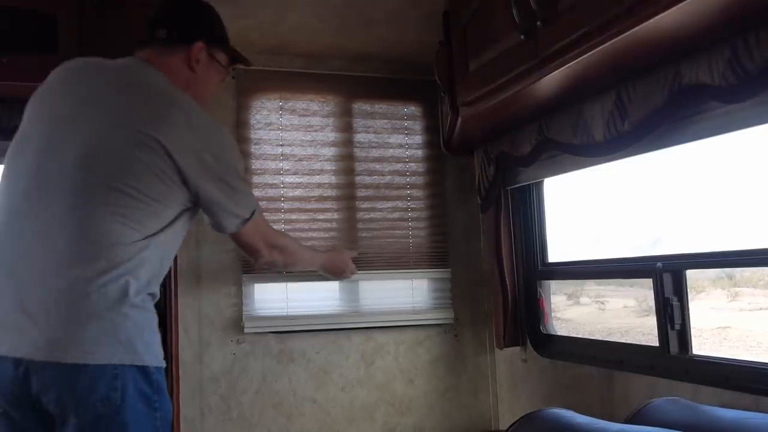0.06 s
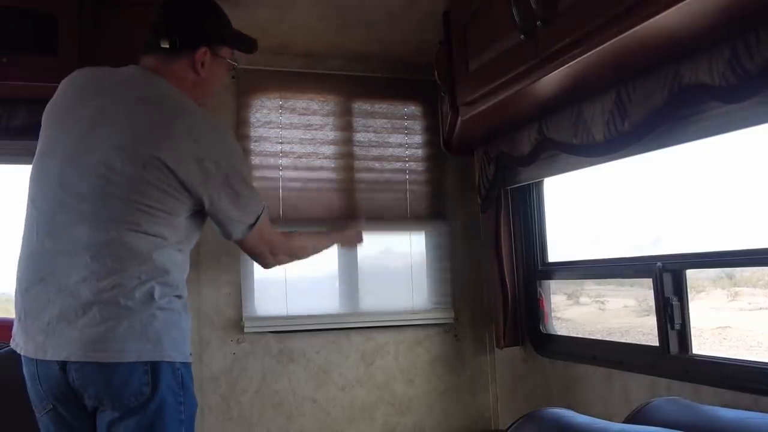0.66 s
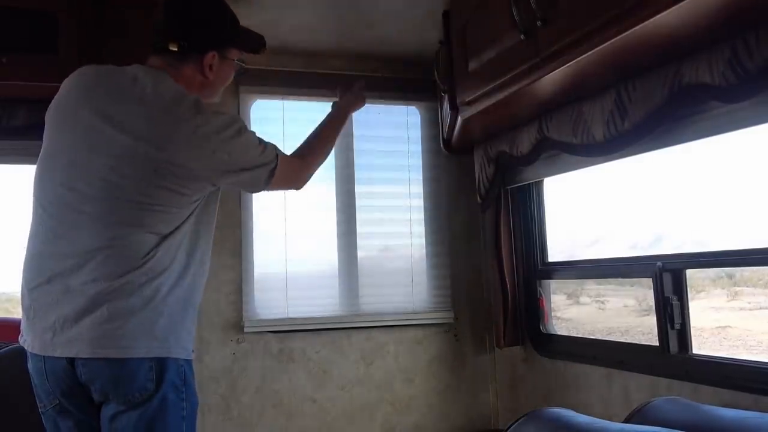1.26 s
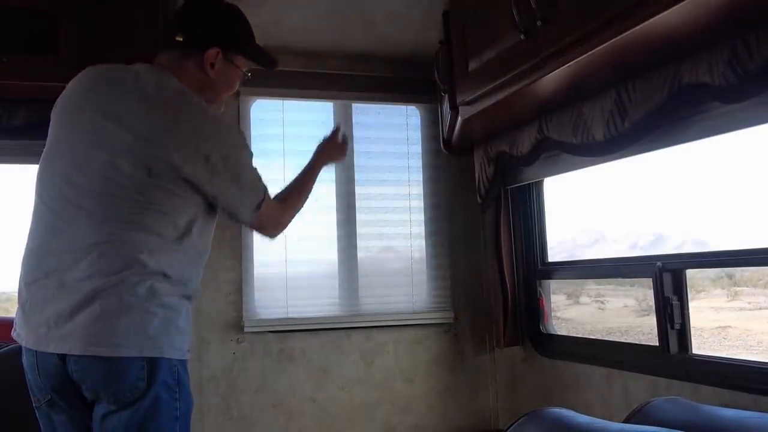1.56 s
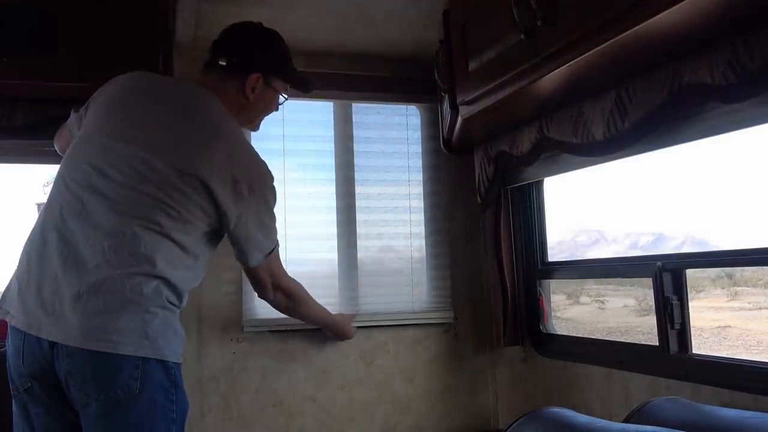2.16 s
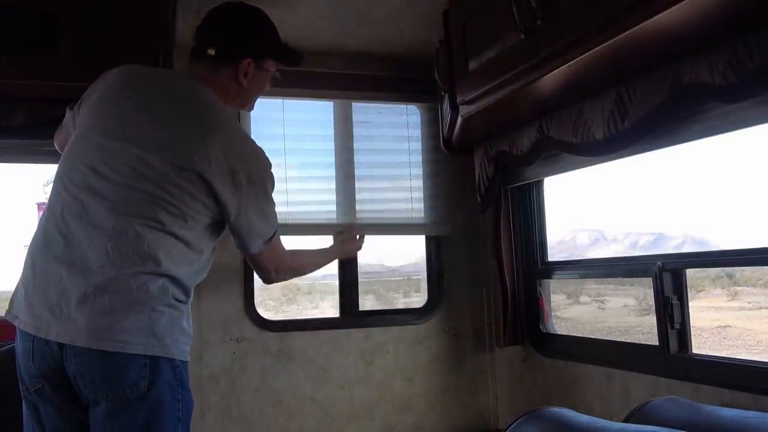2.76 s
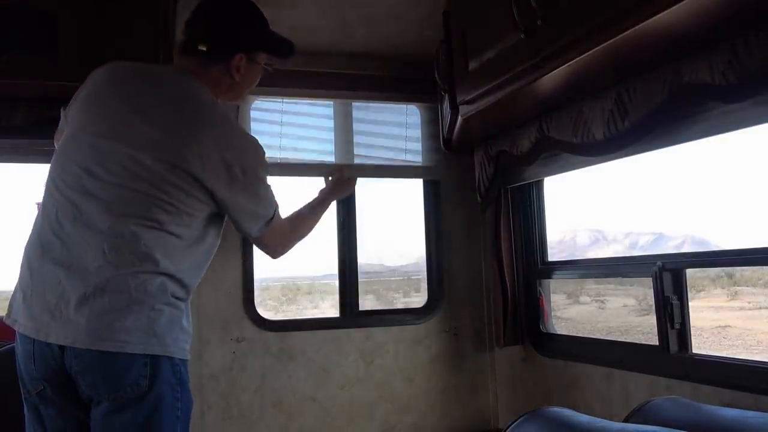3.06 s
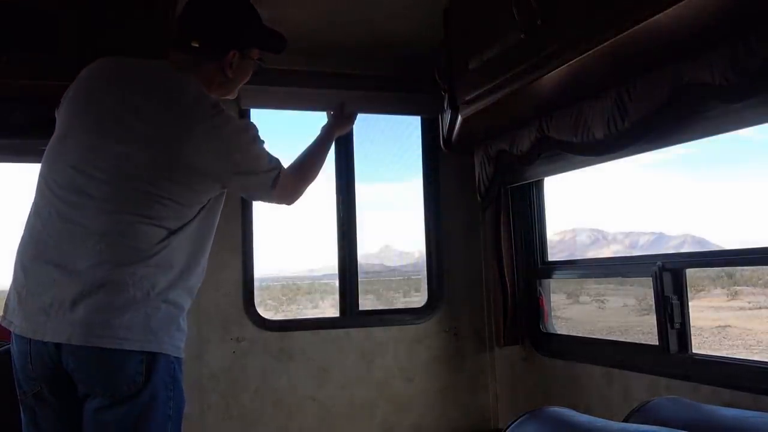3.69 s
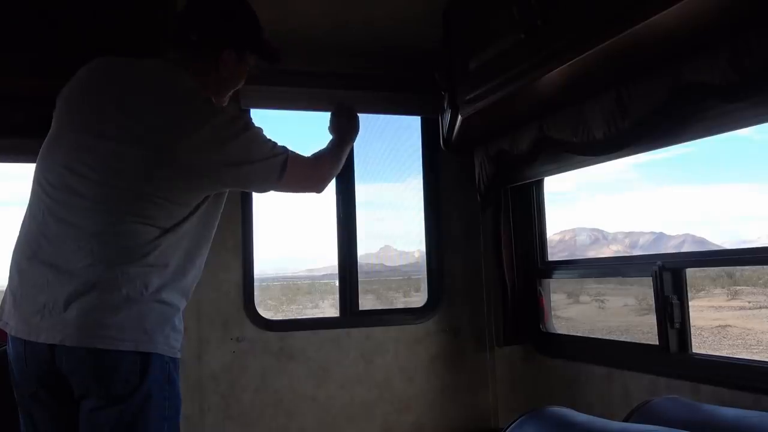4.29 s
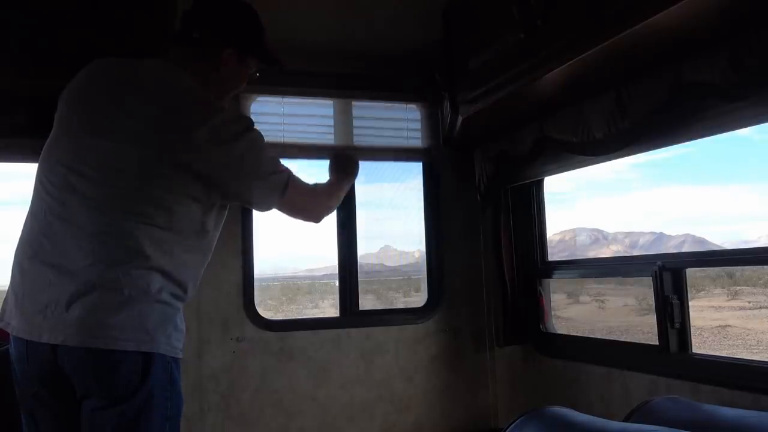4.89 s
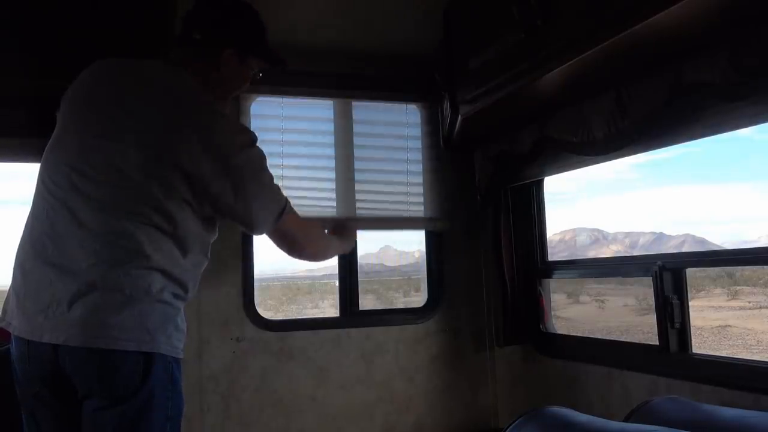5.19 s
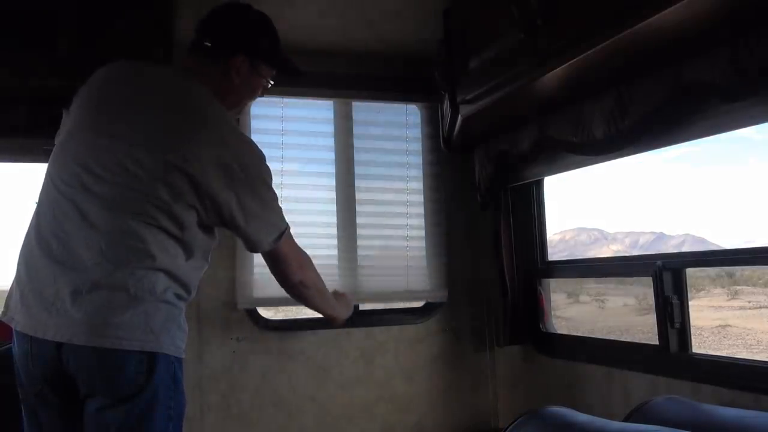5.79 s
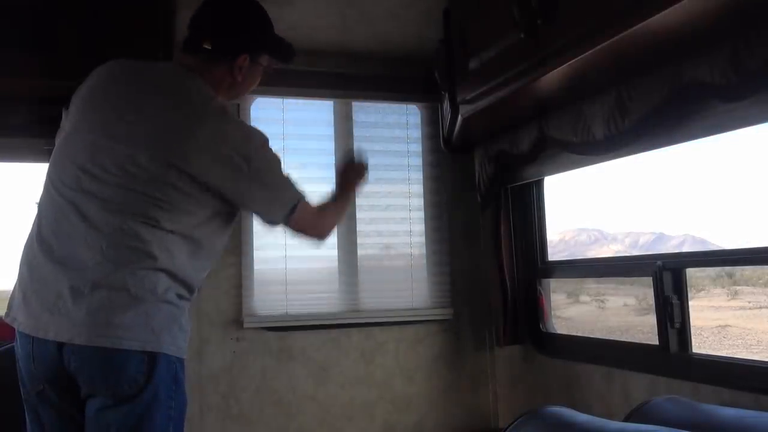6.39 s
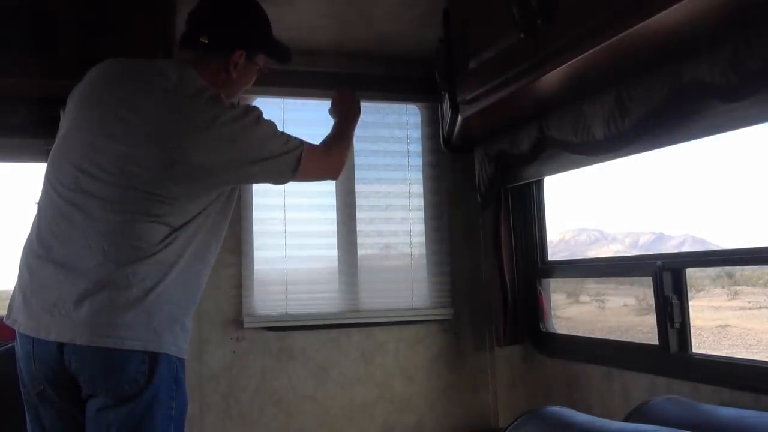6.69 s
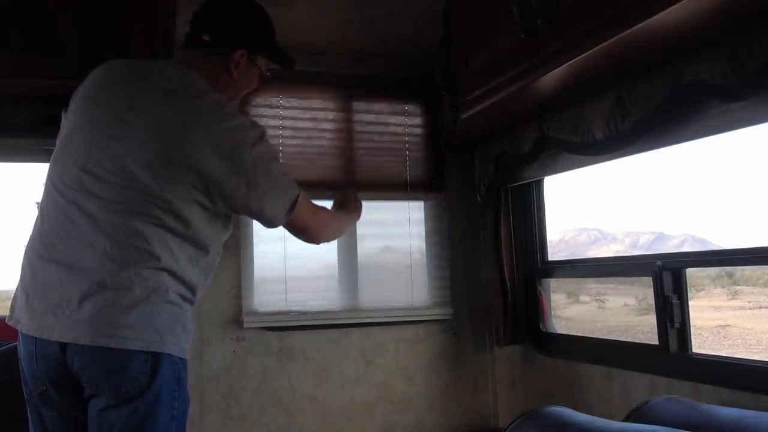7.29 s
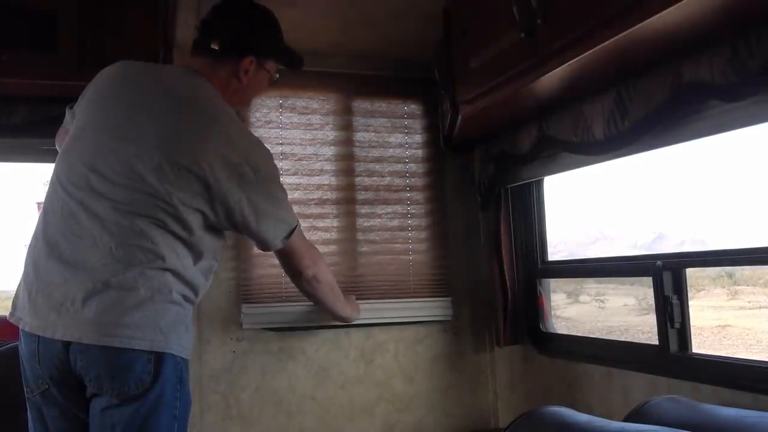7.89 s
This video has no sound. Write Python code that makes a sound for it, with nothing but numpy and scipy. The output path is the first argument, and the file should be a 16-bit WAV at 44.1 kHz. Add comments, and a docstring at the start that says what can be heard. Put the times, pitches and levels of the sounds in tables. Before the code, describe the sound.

A sharp rail clack comes at 0.2 seconds, close by in a small, quiet camper. From 0.5 to 1.2 seconds a pleated shade slides up, its cords whining up and then down in pitch over a dry rasp, ending in a knock. Light taps follow. A second, softer slide runs from 2.3 to 3.5 seconds, with a clack at 2.5 and a quick, loud cluster of clacks at the end. After a few small ticks, the shade is drawn down from 4.6 to 6 seconds with a wavering whine and hissy scrape, stopping with a clack. At 6.2 a knock comes with a low cord twang. The last slide, from 6.9 to 7.9 seconds, whines more strongly, rising and falling, and ends in a light click. A faint room hush lies underneath.

```python
"""Pleated shade in a camper

Close up in a small panelled camper, on a stereo microphone: a day-and-night shade is slid by hand,
twice up and twice down. Its taut braided cords whine through the rails at a pitch that follows the
hand's speed, while cords and pleats rasp. The rails clack at the ends of travel; a released cord twangs."""
import sys
import numpy as np
from scipy import signal
from scipy.fft import rfft, irfft, next_fast_len
from scipy.io import wavfile
from scipy.ndimage import map_coordinates

SR = 44100
rng = np.random.default_rng(int(sys.argv[2]) if len(sys.argv) > 2 else 0)


def wav_out(sig):
    """Save sig, one row per channel (or a flat mono array), as 16-bit PCM at SR to the path in sys.argv[1]."""
    wavfile.write(sys.argv[1], SR, np.round(np.clip(np.atleast_2d(sig).T, -1, 1) * 32767).astype(np.int16))


N = 355005
TIME = np.arange(N) / SR


def amp(db):
    """Decibels to gain."""
    return 10 ** (np.asarray(db) / 20)


def unit(x):
    """Scale to rms 1."""
    return x / np.sqrt(np.mean(x ** 2) + 1e-20)


def along(points, hz):
    """Read (Hz, value) points at hz, on a log axis."""
    freqs, values = np.transpose(points)
    return np.interp(np.log(hz + 1), np.log(freqs + 1), values)


def curve(points):
    """Join (seconds, value) points into one value per sample."""
    return np.interp(TIME, *np.transpose(points))


def bell(x, centre, width):
    """A smooth bump of height 1."""
    return np.exp(-np.minimum(((x - centre) / width) ** 2, 50))


def peaks(resonances, hz):
    """The lift in dB that a set of resonances gives at hz."""
    return sum(db * bell(hz, centre, width) for centre, width, db in resonances)


def swell(start, stop, rise, release=0.029):
    """Gain that climbs 20 dB per rise time up to start, holds until stop, then falls 20 dB per release."""
    return amp(-20 * (np.maximum(start - TIME, 0) / rise + np.maximum(TIME - stop, 0) / release))


def wobble(rate):
    """A smooth random curve, rate knots a second."""
    return map_coordinates(rng.standard_normal(int(N * rate / SR) + 4), [TIME * rate], order=2)


def filtered(x, response):
    """Shape x by a gain that depends on frequency."""
    n = x.shape[-1]
    size = next_fast_len(n + 8192)
    return irfft(rfft(x, size) * response(np.fft.rfftfreq(size, 1 / SR)), size)[..., :n]


def band(x, lo_hz, hi_hz, order=2):
    """Causal band-pass."""
    sos = signal.butter(order, [lo_hz, min(hi_hz, SR / 2 - 1)], "band", fs=SR, output="sos")
    return signal.sosfilt(sos, x)


# Room tone of the still cabin. Each row: frequency in Hz, relative density in dB.
ROOM_TONE = [(12, -29), (20, -3.5), (49, -7.5), (70, -4), (107, -3), (354, -7), (442, -5), (494, -5.5),
             (772, -3.5), (1730, -12), (2110, -14.5), (4350, -16.5), (15700, -20.5)]
def air(level_db=-62.0, side_db=-5):
    """The steady hush of the cabin, all around the microphone."""
    mid, side = unit(filtered(rng.standard_normal((2, N)), lambda hz: amp(along(ROOM_TONE, hz))))
    side = amp(side_db) * side
    drift_db = 0.6 * wobble(6)
    return amp(level_db + drift_db) * np.array([mid + side, mid - side])


# Decay of the cabin's reflections. Each row: frequency in Hz, t60 in seconds.
CABIN_DECAY = [(100, 0.2), (300, .18), (900, 0.24), (1600, 0.26), (3000, 0.2), (12000, 0.24)]
# Their stereo width. Each row: frequency in Hz, side minus mid in dB.
CABIN_WIDTH = [(100, -2), (500, -5), (1000, -8), (2000, -2.5), (5000, 0.5), (12000, 1.5)]
def cabin(x, wet_db, build_s=0.0004, hop=4096):
    """Direct sound plus the quick, dense answer of nearby panels, which shifts as rail and arm move."""
    count = N // hop + 2
    padded = np.pad(x, (hop, count * hop - N))
    pieces = padded[np.arange(count)[:, None] * hop + np.arange(2 * hop)] * np.sqrt(np.hanning(2 * hop))
    # Each overlapping piece gets its own tail of decaying noise.
    hz, t, spectra = signal.stft(rng.standard_normal((2, count, 3 * hop)), SR, nperseg=256)
    spectra = spectra * amp(-60 * t / along(CABIN_DECAY, hz)[:, None]) * (1 - np.exp(-t / build_s))
    spectra[1] *= amp(along(CABIN_WIDTH, hz))[:, None]
    mid, side = signal.istft(spectra, SR, nperseg=256)[1]
    tails = np.array([mid + side, mid - side]) / np.linalg.norm(mid, axis=1)[:, None]
    wet = np.zeros((2, (count + 5) * hop))
    for k, echo in enumerate(signal.fftconvolve(pieces[None], tails, axes=2).swapaxes(0, 1)):
        wet[:, k * hop:][:, :echo.shape[1]] += echo
    return (x + amp(wet_db) * wet[:, hop:hop + N]) / np.hypot(1, amp(wet_db))


# Fingers on the pleats. Each row: middle and half length in seconds, level in dB, centre in Hz.
FINGER_BRUSHES = [(.01, 0.03, -53.5, 2460), (0.133, 0.061, -53.5, 2430), (1.955, 0.027, -54.5, 3150),
                  (4.193, 0.033, -58, 6450), (6.173, 0.067, -59, 2200)]
def brushes(grain_db=2.0):
    """The pleats crinkle softly as the hand takes hold."""
    crinkle = rng.standard_normal(N) * amp(grain_db * wobble(500))
    return sum(amp(db) * bell(TIME, s, half) * unit(band(crinkle, hz / 2, hz * 2, order=1))
               for s, half, db, hz in FINGER_BRUSHES)


# The hand takes up the slack. Each row: start and stop in seconds, level in dB.
CORD_CREEPS = [(2.28, 2.42, -62), (4.512, 4.876, -60.5)]
def creeps(lo_hz=1130, hi_hz=1370, rise_s=0.022, uneven_db=4.5):
    """Slow slips of the cord ring one narrow resonance of the rail."""
    slips = unit(band(rng.standard_normal(N), lo_hz, hi_hz)) * amp(uneven_db * wobble(30))
    return slips * sum(amp(db) * swell(start, stop, rise_s) for start, stop, db in CORD_CREEPS)


# A cord let go. Each row: start in seconds, level in dB, pitch in Hz, t60 in seconds.
CORD_TWANGS = [(1.13, -47, 90.7, 0.33), (1.951, -46.5, 116, 0.26), (3.566, -43, 94, 0.36),
               (6.196, -34, 111.6, 0.43), (7.896, -48, 108, 0.18)]
def twangs(third_db=-7, attack_s=0.0036):
    """A taut cord swings in its first and third modes; the upper one dies sooner."""
    track, t = np.zeros(N), np.arange(SR) / SR
    for s, db, hz, t60 in CORD_TWANGS:
        fade, phase = amp(-60 * t / t60), 2 * np.pi * hz * t
        swing = fade * np.sin(phase) + amp(third_db) * fade ** 2 * np.sin(3 * phase)
        add(track, s, amp(db) * swing * (1 - np.exp(-t / attack_s)))
    return track


def add(track, s, sound):
    """Mix a sound into a track from s seconds on."""
    part = track[round(s * SR):][:len(sound)]
    part += sound[:len(part)]


# The night shade's slacker second cord. Each row: start and stop in seconds, level in dB,
# note in Hz when the whine is at 1 kHz, power of hand speed that the note follows.
CORD_HUMS = [(0.557, 0.58, -48, 539, .1), (.7, .92, -44.5, 470, .25), (6.92, 6.99, -46, 298.5, .1),
             (7.17, 7.501, -49.5, 365, .85)]
def hum(rise_s=0.035, waver_rad=0.96, flutter_db=4.0):
    """The slack cord catches unevenly, so its one low note wavers."""
    speed = curve(np.vstack(HAND_SPEEDS)) / 1000
    waver = waver_rad * wobble(90)
    notes = np.zeros(N)
    for start, stop, db, hz, power in CORD_HUMS:
        phase = 2 * np.pi * np.cumsum(hz * speed ** power) / SR
        notes += amp(db) * swell(start, stop, rise_s) * np.sin(phase + waver)
    return notes * amp(flutter_db * wobble(70))


# Modes of the wall panel. Each row: frequency in Hz, relative level in dB.
PANEL_MODES = [(206, -2.5), (273, 0.5), (350, -5), (465, 2)]
def wall_bumps(t60=0.08, attack_s=0.0028, db_per_octave=24):
    """Each rail contact swings the wall panel, most in the modes near the note of the struck spot."""
    track, t = np.zeros(N), np.arange(SR // 2) / SR
    for s, level, thud_trim, _, _, note in RAIL_CONTACTS:
        swings = sum(amp(db - db_per_octave * abs(np.log2(hz / note))) * np.sin(2 * np.pi * hz * t)
                     for hz, db in PANEL_MODES)
        add(track, s, amp(level + thud_trim - 60 * t / t60) * swings * (1 - np.exp(-t / attack_s)))
    return track


# Modes of a struck rail. Each row: frequency in Hz, relative level in dB, t60 in seconds.
RAIL_RING = [(980, -4, 0.26), (1163, -0.5, 0.26), (1346, -28, 0.076), (1420, -8, 0.12), (1590, -4, 0.2),
             (1780, -7, 0.26), (1860, -5.5, 0.28), (2030, -8, 0.26), (2160, -8, 0.15), (2430, -12.5, 0.32)]
# Knocks of the rails. Each row: start in seconds, level in dB, thud trim and snap trim in dB,
# centre of the clack in Hz, wall note that this spot favours in Hz.
RAIL_CONTACTS = [(0.1906,-13,-11,-3,1040,397), (1.157,-23,-2,-7.5,1150,218), (1.465,-30,1,-7.5,1130,150),
                 (1.948,-48.5,8.5,-1,1900,189), (2.254,-38,-4,-14,950,310), (2.492,-19,-9,2.5,800,464),
                 (3.528,-22.5,-16,-1.5,920,404), (3.556,-18,-2.5,1,1040,302), (3.5642,-16,-2.5,7,940,290),
                 (3.57,-14,-3.5,-9,1330,320), (4.224,-33.5,-2.5,2,1210,290), (4.482,-44,-1.5,-29,524,455),
                 (4.5,-44,-14,0,1350,400), (4.698,-38.5,1,-21,1202,288), (5.734,-37.5,-5,-15,460,339.4),
                 (5.985,-19.5,-6.5,-2,1835,196), (6.182,-27,-3.5,-3.5,1390,333),
                 (6.684,-44.5,0.5,-10,860,200), (6.79,-38.5,-4,-14,600,460), (7.335,-35,-0.5,-9,1140,280.2),
                 (7.894,-32,-10,1,1150,300), (7.974,-44,-6,-5,500,250.4)]
def clacks(thud_t60=0.1, clack_t60=0.075, snap_t60=0.031, spread=1.7,
           thud_db=-10, clack_db=-4.5, snap_db=-4, ring_db=-26, graze_db=-28):
    """Each contact scuffs, thuds in the wall, rings the rail and snaps on its plastic end caps."""
    track, t = np.zeros(N), np.arange(SR // 2) / SR
    for s, level, thud_trim, snap_trim, centre, _ in RAIL_CONTACTS:
        # A harder snap reaches higher into the treble and sets in faster.
        top_hz = 11000 * amp(0.4 * snap_trim)
        attack_s = 0.00045 * amp(-0.7 * snap_trim)
        wall, rail, caps = rng.standard_normal((3, len(t)))
        wall = unit(band(wall, 96, 470, order=3))
        rail = unit(band(band(rail, centre / spread, centre * spread), 315, 1980, order=3))
        caps = unit(band(band(caps, 2500, 6450, order=1), 2250, top_hz))
        ring = sum(amp(db + rng.normal(0, 0.83) - 60 * t / t60)
                   * np.sin(2 * np.pi * (hz * t + rng.random())) for hz, db, t60 in RAIL_RING)
        thud = amp(thud_db + thud_trim - 60 * t / thud_t60) * wall
        clack = amp(clack_db - 60 * t / clack_t60) * rail + amp(ring_db) * ring
        snap = amp(snap_db + snap_trim - 60 * t / snap_t60) * caps
        add(track, s, amp(level) * (thud + clack + snap) * (1 - np.exp(-t / attack_s)))
        # The parts graze each other just before they meet.
        add(track, s - 0.03, amp(level + graze_db) * rail * bell(t, 0.021, 0.01))
    return track


# Colour of each fabric's friction. Each row: frequency in Hz, relative density in dB.
NIGHT_FRICTION = [(47, -64), (80, -15), (241, -20.5), (276, -12.5), (438, -9), (500, -3), (652, -7.5),
                  (778, -3.5), (1410, -7.5), (1580, -5.5), (1930, -13), (2400, -10), (7090, -20),
                  (12600, -30), (15700, -35)]
DAY_FRICTION = [(47, -55), (80, -18), (133, -36), (202, -23), (241, -26.5), (500, -12), (869, -1.5),
                (950, -4.5), (1110, -0.5), (1610, -5.5), (2100, -5), (2900, -11), (4870, -14.5),
                (10500, -23), (15700, -33)]
# Resonances of each hollow rail. Each row: centre and width in Hz, lift in dB.
NIGHT_RAIL_PEAKS = [(214, 28, 10.5), (490, 16, 2.5), (840, 94, 0.5), (1540, 190, -1), (2400, 160, 2)]
DAY_RAIL_PEAKS = [(216, 6.9, 8), (830, 25.6, 2.6), (1154, 62, 3.8), (2140, 290, 3.1), (4500, 610, 5),
                  (5390, 330, 3.6), (7200, 210, 2.8), (10500, 1100, 1.5)]
SHADES = {"night": (NIGHT_FRICTION, NIGHT_RAIL_PEAKS), "day": (DAY_FRICTION, DAY_RAIL_PEAKS)}
def rub(colour, rail, grain_db=2.0):
    """Tiny, uneven slips of cord and pleats sound through the rail's resonances."""
    slips = rng.standard_normal(N) * amp(grain_db * wobble(900) + 0.58 * wobble(45))
    body = filtered(slips, lambda hz: amp(along(colour, hz) + peaks(rail, hz)))
    rumble = unit(band(body, 130, 383, order=4))
    rasp = unit(band(body, 453, 2584, order=5))
    hiss = unit(band(body, 2662, 14700, order=5))
    return np.array([rumble, rasp, hiss])


# A rail on the wall or window frame. Each row: shade, start and stop of full contact in seconds,
# rise time in seconds, levels of rumble, rasp and hiss in dB.
RAIL_DRAGS = [("night", .34, 0.45, 0.057, -62, -55, -57), ("night", 0.6, .68, 0.14, -59, -42, -44),
              ("night", 1.115, 1.165, 0.15, -49, -42, -51), ("day", 2.411, 2.79, 0.1, -50.5, -41.5, -41.5),
              ("day", 5.5, 5.56, 0.068, -63, -56, -50), ("day", 5.76, 5.98, 0.093, -64, -53, -56),
              ("day", 5.963, 5.98, 0.14, -53, -41, -39.5), ("night", 6.91, 7.0, 0.072, -47.5, -42.5, -51),
              ("night", 7.2, 7.36, 0.24, -60.5, -54, -70), ("night", 7.98, 8.0, 0.12, -61.5, -63, -82)]
def drags():
    """A rail touching the wall adds a coarser, deeper scrape."""
    textures = {shade: rub(*body) for shade, body in SHADES.items()}
    return sum(swell(start, stop, rise) * (amp(levels) @ textures[shade])
               for shade, start, stop, rise, *levels in RAIL_DRAGS)


# One harmonic of the whine briefly swells and sings out. Each row: middle and half length in seconds,
# lift in dB, rough frequency of that harmonic in Hz.
WHINE_FLARES = [(0.777, 0.013, 14.5, 1610), (0.821, 0.0049, 10.5, 1590), (1.089, 0.016, 9.5, 870),
                (1.141, 0.0046, 17, 830), (2.687, 0.016, 12, 900), (2.756, 0.016, 12, 890),
                (2.845, 0.035, 10.5, 840), (3.218, 0.084, 6, 1080), (4.887, 0.016, 12.5, 820),
                (5.0, .05, 6.5, 2080), (5.035, .07, 18.5, 4150), (5.178, 0.049, 15, 3400),
                (5.531, 0.031, 2.5, 1110), (7.045, 0.014, 12, 710), (7.118, 0.032, 7, 810),
                (7.29, 0.019, 7.5, 1130), (7.321, 0.038, 7.5, 2320), (7.548, 0.03, 10, 800),
                (7.699, 0.024, 8.5, 710)]
# Fixed narrow resonances that the whine sweeps across. Each row: centre and width in Hz, lift in dB.
WHINE_RESONANCES = [(500, 15, 9), (718, 6, 5), (845, 13, 2.5), (1110, 23, 3), (1650, 22, 2),
                    (2080, 20, 4.5)]
def whine(hz, colour, second_db, step_db, smear, jitter=0.01506, flutter_db=3.5):
    """Braid ribs tick through the rail at hz; the shade and fixed resonances colour each harmonic."""
    phase = 2 * np.pi * np.cumsum(hz * (1 + jitter * wobble(260))) / SR
    tone = np.zeros(N)
    for k in range(1, 5):
        flare = sum(db * bell(TIME, s, half) for s, half, db, partial in WHINE_FLARES
                    if round(partial / hz[round(s * SR)]) == k)
        level = along(colour, k * hz) + peaks(WHINE_RESONANCES, k * hz) + flare
        blur = 0
        if k > 1:
            level += second_db + step_db * (k - 2)
            blur = smear * k / 2 * wobble(200)  # uneven ribs smear the overtones into a rasp
        tone += amp(level + flutter_db * wobble(100)) * np.sin(k * phase + blur)
    return np.sqrt(2) * tone


# Hand speed, one list a stroke. Each row: time in seconds, tick rate of the braid in Hz.
HAND_SPEEDS = [
    [(.55, 490), (.624, 965), (.732, 1540), (.78, 1614), (.86, 1518), (.932, 1105), (1.03, 900),
     (1.18, 820)],
    [(2.4, 230), (2.55, 584), (2.69, 898), (2.85, 845), (3.07, 715), (3.22, 534.4), (3.384, 709),
     (3.52, 659)],
    [(4.72, 380), (4.888, 835.5), (4.97, 1022), (5.04, 1045), (5.134, 889), (5.242, 776), (5.36, 507.3),
     (5.54, 559.5), (5.66, 386.6), (5.96, 464)],
    [(6.95, 270.3), (7.036, 701), (7.13, 816.7), (7.25, 1079), (7.336, 1173), (7.45, 986), (7.544, 782.5),
     (7.64, 723.6), (7.78, 688.6), (7.9, 578)],
]
# Up, up, down, down, close to the microphone. Each row: shade, start, stop and pressure build time
# in seconds, rasp and hiss gains in dB, easing of the friction in dB per second, whine gain in dB,
# second harmonic's trim in dB, step per further harmonic in dB, smear of the overtones in radians.
SHADE_STROKES = [("night", 0.532, 1.147, 0.048, -39, -41, -7.5, -35.5, -3.5, -6.5, 0.76),
                 ("day", 2.33, 3.54, 0.063, -47, -43, -2.4, -49.5, -1.5, -9, 0.67),
                 ("day", 4.602, 5.98, 0.19, -44.5, -40, -3, -47.5, -0.61, 0, .42),
                 ("night", 6.865, 7.905, 0.03, -39.5, -41.5, -4, -38.5, -5.5, -6, 0.66)]
def slides(rasp_db_per_octave=3.5, hiss_db_per_octave=1.7, whine_db_per_octave=5.5,
           rumble_db=-21.5, slack_s=0.012):
    """The hand slides a shade: faster is higher and louder, and pressure builds, then eases."""
    textures = {shade: rub(*body) for shade, body in SHADES.items()}
    cords, friction = np.zeros((2, N))
    for speed, stroke in zip(HAND_SPEEDS, SHADE_STROKES):
        shade, start, stop, build, rasp_db, hiss_db, easing, whine_db, *overtones = stroke
        hz = curve(speed)
        octaves = np.log2(hz / 1000)
        age = np.maximum(TIME - start, 0)
        pressure = (1 - np.exp(-age / build)) * swell(start, stop, build)
        rumble, rasp, hiss = textures[shade]
        rubbing = amp(rasp_db + rasp_db_per_octave * octaves) * (rasp + amp(rumble_db) * rumble)
        rubbing += amp(hiss_db + hiss_db_per_octave * octaves) * hiss
        friction += pressure * amp(easing * age) * rubbing
        taut = swell(start, stop - slack_s, build)  # the cord goes slack just before the rail stops
        tone = whine(hz, SHADES[shade][0], *overtones)
        cords += pressure * taut * amp(whine_db + whine_db_per_octave * octaves) * tone
    return cords, friction


def scene():
    """Both shades and their knocks, centred in front of the microphone, with the cabin around them."""
    cords, friction = slides()
    bass = twangs() * amp([[-2], [1]])  # the long waves reach the right microphone a little stronger
    tones = cabin(cords + hum() + creeps() + wall_bumps(), wet_db=-5)
    scrapes = cabin(friction + drags() + brushes(), wet_db=-1.5)
    knocks = cabin(clacks(), wet_db=-2.5)
    return bass + tones + scrapes + knocks + air()


def record(dry):
    """The camera keeps nothing above its band limit."""
    return filtered(dry, lambda hz: hz < 15750)


dry = scene()
out = record(dry)
wav_out(out)
```